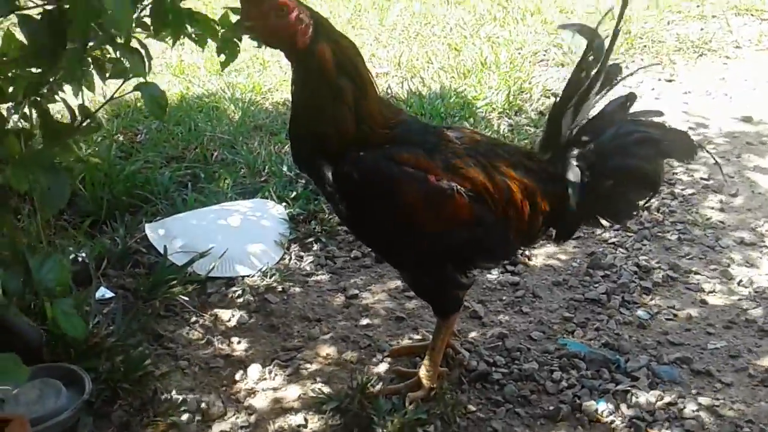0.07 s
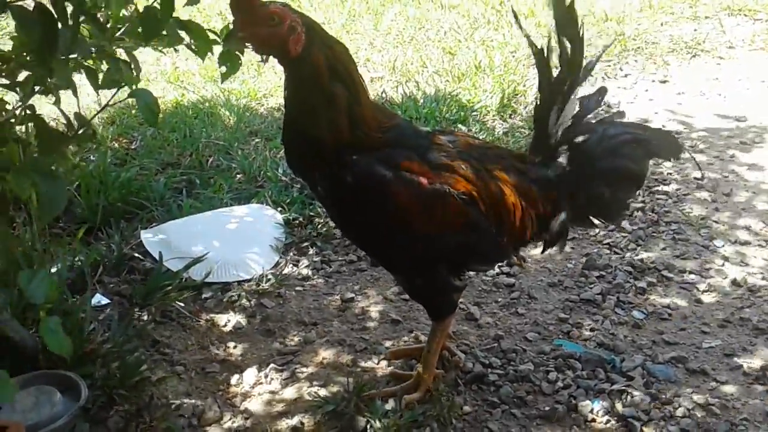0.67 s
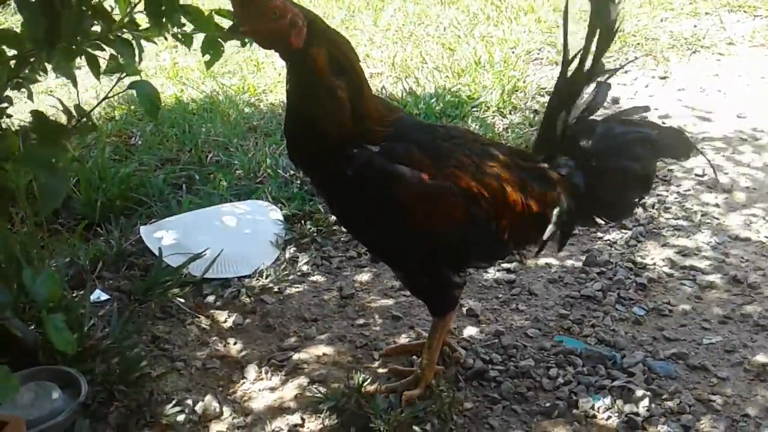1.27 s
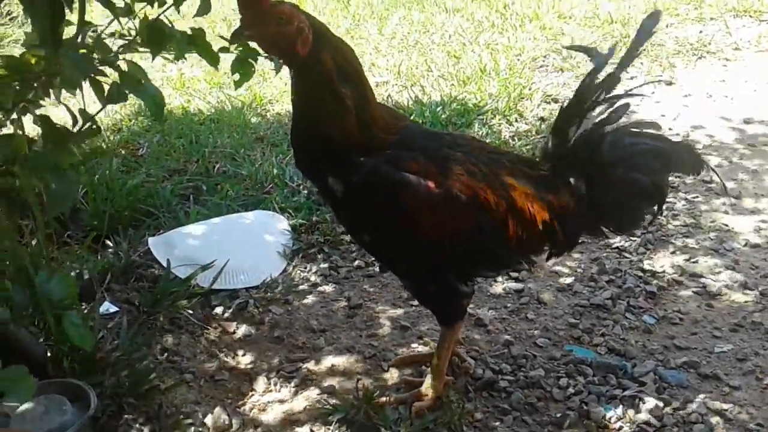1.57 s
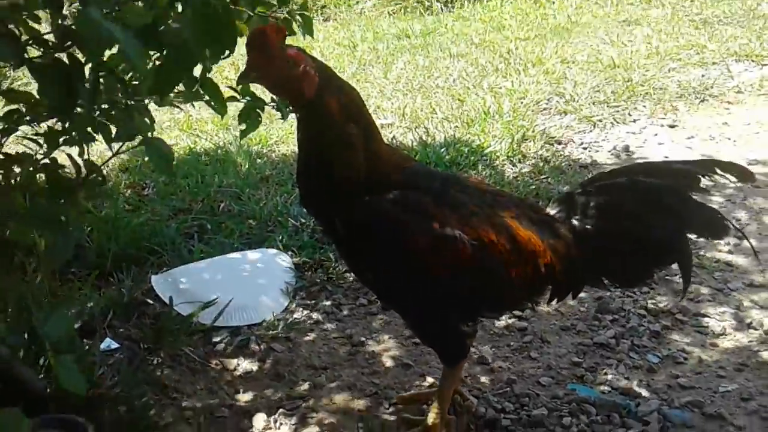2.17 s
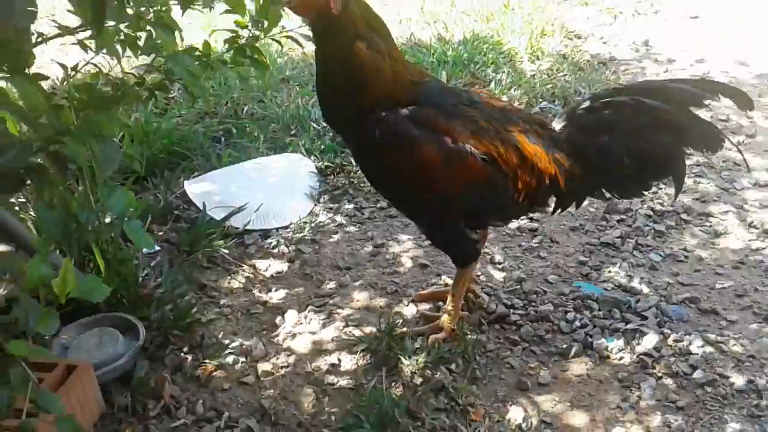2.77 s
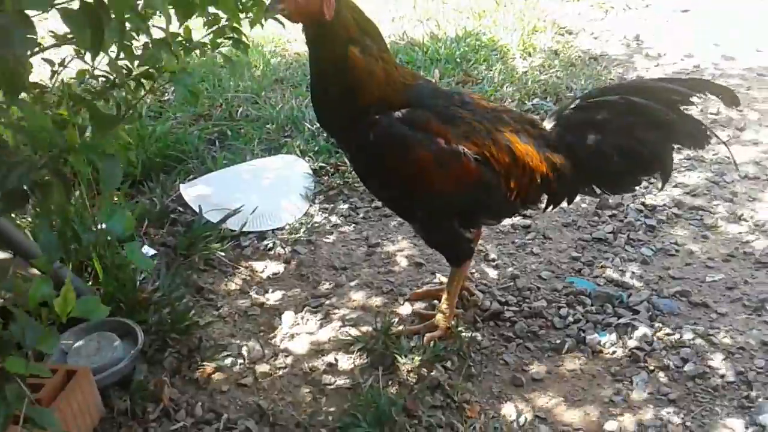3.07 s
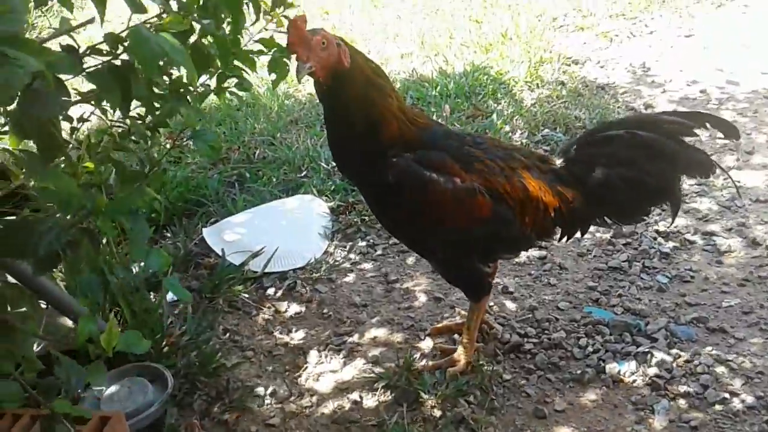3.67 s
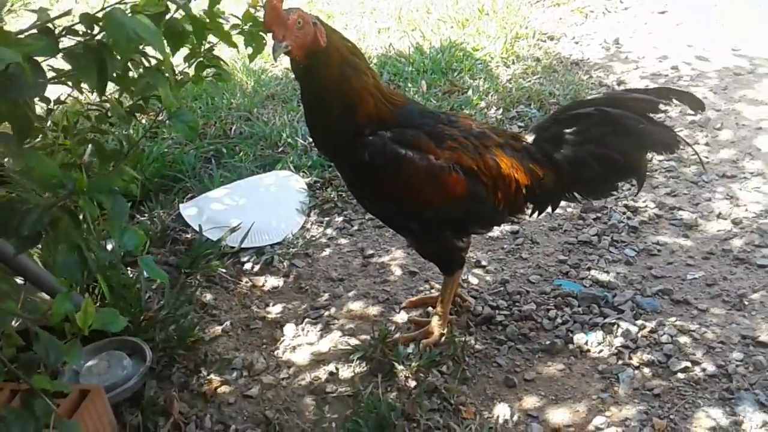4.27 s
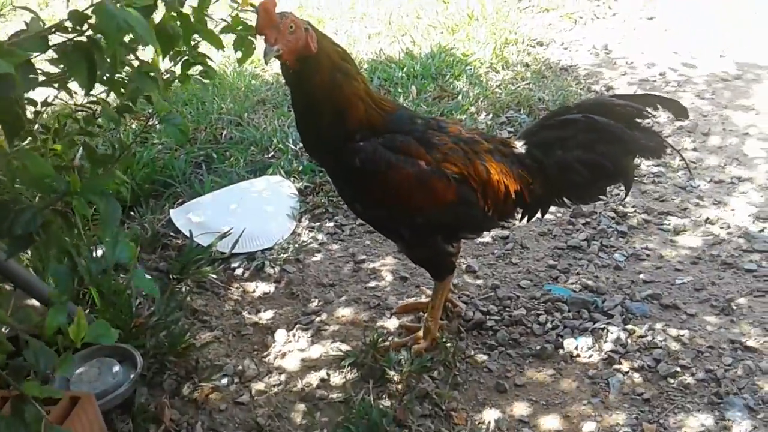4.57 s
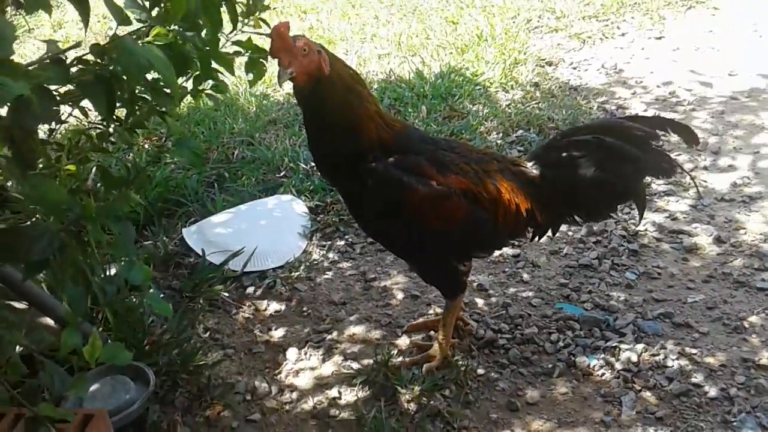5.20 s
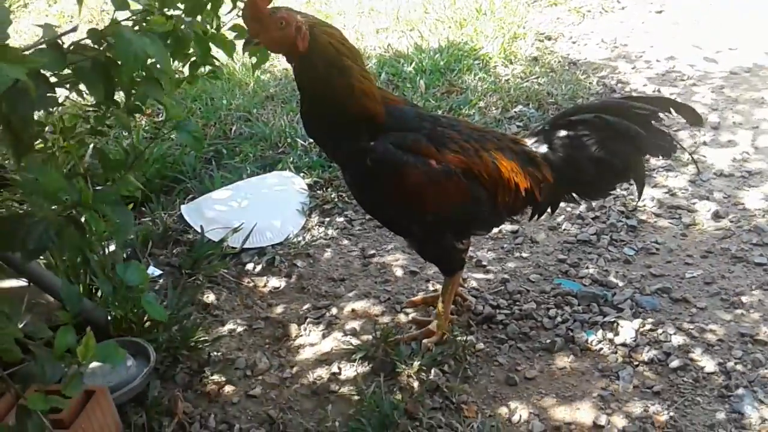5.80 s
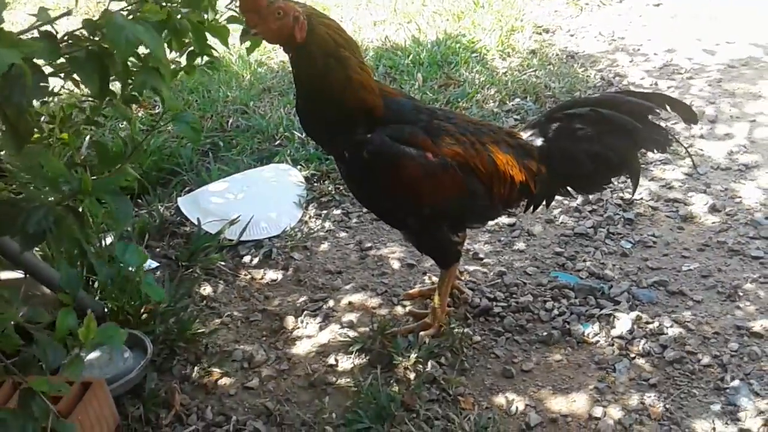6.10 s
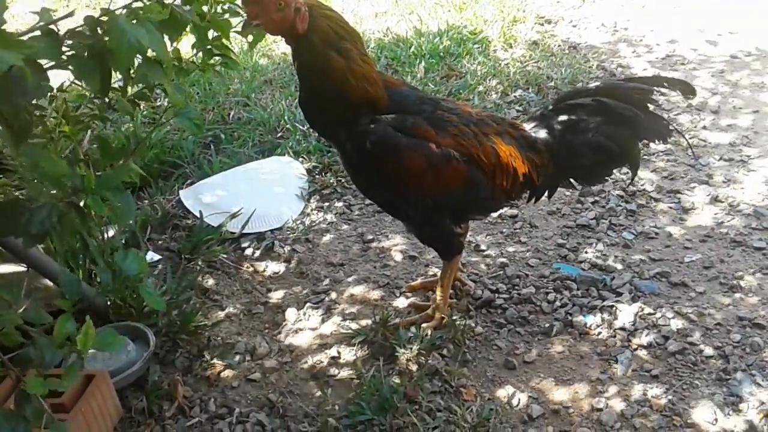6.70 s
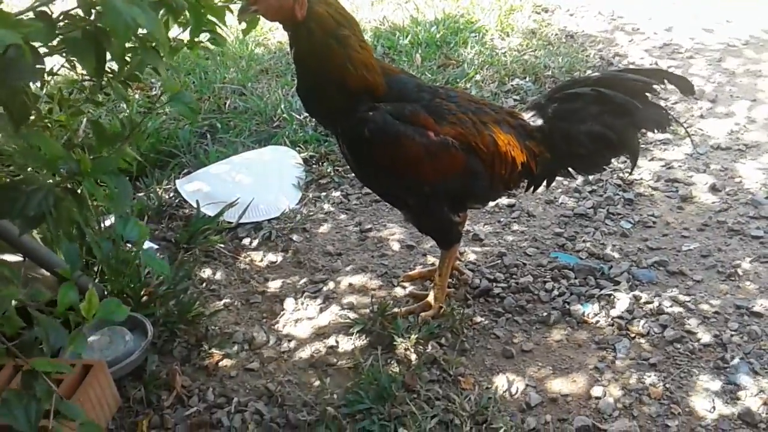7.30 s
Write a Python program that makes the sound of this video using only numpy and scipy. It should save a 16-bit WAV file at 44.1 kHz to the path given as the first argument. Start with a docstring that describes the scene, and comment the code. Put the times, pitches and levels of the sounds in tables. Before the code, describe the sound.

Wind thumps on the microphone, then a rooster clucks softly and squawks once over a steady outdoor hiss and faint leaf rustle.

```python
"""Rooster in a breezy yard

A rooster gives three soft clucks, one loud rasping squawk and a last cluck: uneven pulses
and puffs of breath from his syrinx, coloured by throat and beak. Wind buffets the
microphone over a steady outdoor hiss and a low drone. Leaves rustle in bright swells,
a small bird whistles far off, and there are two faint clicks."""
import sys
import numpy as np
from scipy import signal
from scipy.fft import rfft, irfft
from scipy.io import wavfile
from scipy.ndimage import uniform_filter1d

SR = 44100
rng = np.random.default_rng(int(sys.argv[2]) if len(sys.argv) > 2 else 0)


def wrap_up_sound(samples):
    """Save the sound to the file named by the first command line argument, as 16-bit audio."""
    columns = np.atleast_2d(samples).T
    # keep every value between -1 and 1, then stretch to whole-number steps
    tamed = np.clip(columns, -1, 1)
    steps = np.round(tamed * 32767).astype(np.int16)
    wavfile.write(sys.argv[1], SR, steps)


N = 328545
TIME = np.arange(N) / SR

# gusts on the microphone: (peak time [s], level [dB], half length [s])
GUSTS = [(0.007, -23.5, 0.082), (0.15, -31, 0.063), (0.485, -30.5, 0.14), (0.67, -23.5, 0.031),
         (1.125, -29.5, 0.034), (1.285, -25, 0.041), (1.408, -24, 0.042), (1.548, -23, 0.058),
         (1.658, -29, 0.059), (1.769, -17.5, 0.07), (1.971, -32.5, 0.036), (4.13, -44.5, .08),
         (4.267, -40.5, 0.056), (4.76, -52, 0.12), (5.7, -43, .17), (6.55, -41.5, .025),
         (6.792, -39.5, 0.13), (7.087, -35.5, 0.052)]
# the strongest eddies, each a distinct thump: (time [s], peak level [dB], centre [Hz])
EDDIES = [(0.037, -12.5, 123), (.046, -11.5, 203), (.118, -20.5, 171), (0.201, -20, 177),
          (.311, -25.5, 157), (.348, -22, 151), (0.469, -12, 178), (.502, -17, 187), (0.637, -12, 177),
          (0.65, -9.5, 181), (1.29, -10.5, 189), (1.382, -21.5, 242), (1.411, -25, 403),
          (1.441, -18.5, 154), (1.543, -16, 161), (1.653, -11, 168), (1.765, -11.5, 273), (1.78, -6, 180),
          (1.802, -11, 178), (1.843, -18.5, 182), (2.776, -37.5, 106), (4.233, -28, 147),
          (4.287, -24.5, 106), (4.872, -34, 94), (5.622, -26, 180), (7.09, -22.5, 136)]
# colour of the wind rumble: (frequency [Hz], level [dB])
WIND_SPECTRUM = [(25, -16), (50, -9), (95, 4), (160, 1.5), (230, -5), (320, -11.5), (450, -24.5),
                 (700, -36), (1200, -44), (3000, -84)]
# the background bed: (time [s], far noise level [dB], hiss level [dB])
BED_LEVELS = [(0, -50, -47.5), (1.5, -51, -48), (3.0, -51.5, -49.5), (4.1, -50, -49), (5.1, -50, -50.5),
              (5.7, -50.5, -52), (7.45, -49, -48.7)]
# colour of the far outdoor noise: (frequency [Hz], level [dB])
FAR_SPECTRUM = [(25, -20), (60, -2.5), (120, 2), (200, 4), (290, 2), (420, -3.5), (650, -1.5), (1100, -4),
                (1800, -9.5), (2800, -19), (5000, -19.5), (12000, -52)]
# colour of the hiss: (frequency [Hz], level [dB])
HISS_SPECTRUM = [(1200, -9.5), (2200, -3.5), (3100, -6), (4500, -1.5), (6500, -3.5), (8700, 1.5),
                 (10000, -5), (11500, -10), (14000, -13.5), (16000, -15.5)]
# soft swells of leaves: (peak time [s], level [dB], half length [s])
RUSTLES = [(0.165, -51, 0.089), (.8, -53.5, 0.11), (1.56, -66, .07), (2.43, -56, .1), (5.06, -51, 0.091),
           (5.238, -58, 0.11), (5.7, -56.5, 0.36), (6.348, -54, 0.056)]
# colour of the leaves: (frequency [Hz], level [dB])
LEAF_SPECTRUM = [(1500, -32), (2500, -3), (4500, -10), (7000, -1), (9300, 8), (11500, -3.5), (16000, -11)]
# one contour for each far whistle: (time [s], level [dB], pitch [Hz])
WHISTLES = [
    [(1.36, -70, 4500), (1.41, -60, 4800), (1.44, -60, 5100), (1.465, -56, 5550), (1.505, -51, 5720),
     (1.522, -66, 5650)],
    [(5.03, -68, 2750), (5.07, -57, 2620), (5.11, -58, 2520), (5.14, -70, 2480)],
]
# early reflections off ground and bushes: (delay [s], gain [ratio])
REFLECTIONS = [(.0025, .15), (.0051, .07), (.118, .02)]
# the yard's tail: (frequency [Hz], time to fall 60 dB [s])
ECHO_T60 = [(200, 1), (1200, 0.54), (4000, 0.058), (12000, 0.031)]
# clucks: (start [s], beak open [s], effort [dB], swell while open [dB], end pitch [Hz],
# rise while open [share of pitch], beak opening [ratio], neck posture [ratio])
CLUCKS = [(2.962, 0.0216, -40.5, 2.5, 313, -0.088, 0.93, 1.07),
          (3.145, 0.031, -37.5, 1, 292.6, -0.055, 1.05, 0.99), (3.339, 0.031, -34, 5.5, 331, .12, 1, 1.02),
          (3.772, 0.033, -32, 9, 330, 0.16, 1, 0.89)]
# throat resonances in a cluck: (centre [Hz], width [Hz], level [dB])
CLUCK_THROAT = [(310, 180, 9), (650, 490, 8.5), (1250, 360, 10.5), (2090, 98, -5), (4000, 780, -6.5),
                (5100, 490, -13)]
# the squawk breaks into a rasp, holds a clear note and ends in a rattle:
# (time [s], effort [dB], pitch [Hz], roughness [0-1], beak opening [ratio])
SQUAWK = [(3.516, -46, 385, .1, .97), (3.525, -28, 398, .15, 1.0), (3.541, -15.5, 416, .28, 1.04),
          (3.564, -15.8, 418, .65, 1.01), (3.586, -17.3, 386, .3, .97), (3.623, -20.5, 376, .18, .95),
          (3.626, -30, 375, .85, .97), (3.647, -28.5, 385, .85, .97), (3.657, -48, 380, .5, .95)]
# throat resonances in the squawk: (centre [Hz], width [Hz], level [dB])
SQUAWK_THROAT = [(412, 70, -24), (1030, 175, -6), (1254, 265, 0), (1400, 89, -36), (2230, 230, -22),
                 (3460, 620, -19.5), (3910, 130, -14.5), (4080, 170, -16.5), (4540, 850, -22),
                 (6050, 470, -28), (7680, 2500, -26), (9020, 2000, -25), (11700, 720, -37)]
# the voice catches in the rasp: (time [s], dip [dB], half length [s])
CATCHES = [(3.546, -9, .0016), (3.5565, -15, .0022), (3.5675, -8, .002), (3.5792, -8, .001)]
# faint clicks: (time [s], level [dB], centre [Hz], width [Hz], decay [s])
CLICKS = [(4.712, -41, 7500, 16000, .004), (4.991, -31, 600, 700, .0018)]


def from_db(db):
    """Decibels to gain."""
    return 10 ** (np.asarray(db) / 20)


def unit(x):
    """Scales to rms 1."""
    return x / np.sqrt(np.mean(x ** 2) + 1e-20)


def on_log_axis(points, hz):
    """Reads a table along a log frequency axis."""
    f, value = np.transpose(points)
    return np.interp(np.log(hz + 1), np.log(f + 1), value)


def curves(rows, t):
    """A table's columns as automation curves at the times t."""
    s, *columns = np.transpose(rows)
    return [np.interp(t, s, c) for c in columns]


def add(mix, s, sound):
    """Mixes a sound in at time s."""
    part = mix[max(round(s * SR), 0):][:len(sound)]
    part += sound[:len(part)]


def butter(x, kind, hz, order):
    """A Butterworth low or high cut."""
    return signal.sosfilt(signal.butter(order, hz, kind, fs=SR, output="sos"), x)


def noise(spectrum):
    """Steady noise of a given colour."""
    gain = from_db(on_log_axis(spectrum, np.fft.rfftfreq(N, 1 / SR)))
    return unit(irfft(rfft(rng.standard_normal(N)) * gain, N))


def wander(t, rate_hz):
    """A random curve that takes a new value rate_hz times a second."""
    return np.interp((t - t[0]) * rate_hz, np.arange(2048), rng.standard_normal(2048))


def levelled(x, span_s):
    """Rides out swells slower than span_s and keeps the quick flutter."""
    size = max(int(span_s * SR), 8)
    power = uniform_filter1d(uniform_filter1d(x ** 2, size), size)
    return x / np.sqrt(abs(power) + 1e-14)


def resonance(x, hz, width):
    """A steep resonance of gain 1 that follows the curve hz."""
    turn = np.exp(2j * np.pi * np.cumsum(hz * np.ones(len(x))) / SR)
    r = np.exp(-np.pi * width / SR)
    return 2 * (turn * signal.lfilter([(1 - r) ** 2], [1, -2 * r, r * r], x / turn)).real


def wind(breeze_db=-58, light_air_db=-45.5, gust_db=-1, lumpy_db=5.5, eddy_db=1, eddy_cycles=.88):
    """Lumpy gusts swell and die at the microphone; each strong eddy is a brief pressure swing."""
    gusts = [from_db(db) * np.exp(-abs((TIME - s) / half) ** 1.18) for s, db, half in GUSTS]
    flow = np.sqrt(from_db(breeze_db) ** 2 + sum(gust ** 2 for gust in gusts))
    brisk = noise(WIND_SPECTRUM)
    light = unit(butter(noise(WIND_SPECTRUM), "lowpass", hz=150, order=1))  # slow air is duller
    share = flow / (flow + from_db(light_air_db))
    turbulence = levelled(np.sqrt(share) * brisk + np.sqrt(1 - share) * light, span_s=.04)
    pressure = turbulence * flow * from_db(gust_db + lumpy_db * np.tanh(wander(TIME, 70)))
    t = np.arange(-.03, .03, 1 / SR)
    for (s, db, hz), phase in zip(EDDIES, rng.random(len(EDDIES))):
        swing = np.cos(2 * np.pi * (hz * t + phase)) / np.cosh(t * hz / eddy_cycles * 2)
        add(pressure, s + t[0], from_db(db + eddy_db) * swing)
    # pressure grows with the square of the flow, so strong swings gain overtones
    pressure += .7 * butter(pressure ** 2, "highpass", hz=200, order=4)
    return butter(pressure, "highpass", hz=68, order=3)  # the small microphone passes no deep bass


def background(drone_db=-53):
    """A bed of far outdoor noise, bright hiss and a low, distant drone."""
    far_db, hiss_db = curves(BED_LEVELS, TIME)
    far = noise(FAR_SPECTRUM) * from_db(far_db + .5 * wander(TIME, 14))
    hiss = noise(HISS_SPECTRUM) * from_db(hiss_db + .63 * wander(TIME, 22))
    drone = unit(resonance(rng.standard_normal(N), hz=191.3, width=22))
    return far + hiss + from_db(drone_db) * drone


def leaves():
    """Leaves rustle in brief swells of bright noise."""
    level = sum(from_db(db) * np.exp(-((TIME - s) / half) ** 2) for s, db, half in RUSTLES)
    return noise(LEAF_SPECTRUM) * level


def small_bird(waver_hz=90):
    """Thin, far whistles: gliding sines with a fast waver."""
    out = np.zeros(N)
    for contour in WHISTLES:
        t = np.arange(contour[0][0], contour[-1][0], 1 / SR)
        db, hz = curves(contour, t)
        cycles = np.cumsum(hz + waver_hz * wander(t, 430)) / SR
        add(out, t[0], from_db(db) * unit(np.sin(2 * np.pi * cycles)))
    return out


def reflections(x):
    """Near surfaces repeat a call faintly and comb its spectrum."""
    out = np.zeros(N)
    for delay, gain in REFLECTIONS:
        add(out, delay, gain * x)
    return out


def yard_echo(x, taps_per_s=2000, predelay_s=.008):
    """Thin scatter from bushes and ground; the treble dies first."""
    taps = rng.standard_normal(SR) * (rng.random(SR) < taps_per_s / SR)
    taps *= np.arange(SR) > predelay_s * SR
    hz, t, spectrum = signal.stft(taps, SR, nperseg=256)
    decay = from_db(-60 * t / on_log_axis(ECHO_T60, hz)[:, None])
    tail = signal.istft(spectrum * decay, SR, nperseg=256)[1]
    return signal.fftconvolve(x, tail / np.linalg.norm(tail))[:N]


def cluck(start, open_s, effort_db, swell_db, pitch_hz, rise, opening,
          attack_s=.0045, shut_s=.0056, tail_s=.04, fade_db_per_s=482):
    """Curves for one cluck: it swells and bends, then the beak snaps shut on a soft, dying hum."""
    t = np.arange(0, open_s + tail_s, 1 / SR)
    to_go, after = np.maximum(1 - t / open_s, 0), np.maximum(t - open_s, 0)
    shut = np.clip((t - open_s) / shut_s + .5, 0, 1)
    attack_db = 20 * np.log10(np.clip(t / attack_s, .05, 1))
    db = effort_db + attack_db - swell_db * to_go - .5 * shut - fade_db_per_s * after
    rough = np.interp(shut, [0, 1], [.35, .15])
    beak = np.interp(shut, [0, 1], [opening, .643])
    return start + t, db, pitch_hz * (1 - rise * to_go), rough, beak


def syrinx(t, hz, rough, jitter, shimmer):
    """The voice source beats unevenly and lets out a puff of air each cycle."""
    cycles = np.cumsum(hz) / SR
    uneven = cycles + jitter * rough * (wander(t, 350) + .5 * wander(t, 138.3))
    pulses = sum(np.cos(2 * np.pi * k * uneven) for k in range(1, 40) if k != 3)
    pulses *= 1 + shimmer * rough * wander(t, 416)
    # the throat locks the third harmonic into a clean tone, except where the voice is rough
    pulses += (1 - rough ** 2) * np.cos(2 * np.pi * 3 * cycles)
    puffs = (.71 + np.exp(-(cycles % 1) / .38)) * rng.standard_normal(N)[:len(t)]
    return unit(pulses), unit(puffs)


def voice(t, effort_db, hz, rough, beak, throat, neck,
          edge_db, jitter, shimmer, rasp, muffle_db, strain, notch_hz=1740):
    """The throat shapes the syrinx into a low body, tuned by the beak, and an edge, by the neck."""
    pulses, puffs = syrinx(t, hz, rough, jitter, shimmer)
    body, edge = 0, 0
    for centre, width, db in throat:
        # the higher the resonance, the more it is fed by turbulence
        airy = np.clip(rasp * rough + (centre / 4800) ** 2, 0, .95)
        drive = from_db(db) * (np.sqrt(1 - airy ** 2) * pulses + airy * puffs)
        if centre < notch_hz:
            body += resonance(drive, centre * beak, width)
        else:  # a closing beak muffles the upper resonances
            edge += resonance(drive, centre * neck, width) * from_db(muffle_db * (beak - 1))
    notch = signal.iirnotch(notch_hz, notch_hz / 400, SR)  # 400 Hz wide
    body, edge = signal.lfilter(*notch, [body, edge])
    # the rasping edge follows the effort at its own rate
    edge = edge / np.std(body) * from_db(edge_db + strain * (effort_db - effort_db.max()))
    catch_db = sum(db * np.exp(-((t - s) / half) ** 2) for s, db, half in CATCHES)
    body = levelled(body, span_s=.002) * from_db(catch_db)
    call = from_db(effort_db) * (body + edge) * signal.windows.tukey(len(t), .05)
    # the call carries nothing below about three quarters of its lowest pitch
    return butter(call, "highpass", hz=.75 * hz.min(), order=4)


def rooster(squawk_trim_db=-1.1):
    """Soft low clucks around one forced squawk, all from the same voice."""
    out = np.zeros(N)
    for *row, neck in CLUCKS:
        t, *controls = cluck(*row)
        add(out, t[0], voice(t, *controls, CLUCK_THROAT, neck, edge_db=2,
                             jitter=.11, shimmer=.7, rasp=.75, muffle_db=35, strain=.1))
    t = np.arange(SQUAWK[0][0], SQUAWK[-1][0], 1 / SR)
    squawk = voice(t, *curves(SQUAWK, t), SQUAWK_THROAT, neck=1, edge_db=-3.8,
                   jitter=.13, shimmer=.9, rasp=1, muffle_db=20, strain=-.08)
    add(out, t[0], from_db(squawk_trim_db) * squawk)
    return out


def clicks():
    """Two dry ticks of fast-dying noise, one bright and one dull."""
    out, t = np.zeros(N), np.arange(2048) / SR
    for s, db, hz, width, decay in CLICKS:
        burst = levelled(resonance(rng.standard_normal(len(t)), hz, width), span_s=.0068)
        add(out, s, from_db(db) * burst * np.exp(-t / decay))
    return out


def scene(echo_send_db=-27):
    """The mono mix: both birds get the yard's echo, everything else stays dry."""
    birds = rooster() + small_bird()
    birds = birds + reflections(birds) + from_db(echo_send_db) * yard_echo(birds)
    return (birds + wind() + leaves() + background() + clicks())[None]


def record(dry):
    """A steep high cut takes the very top off the mix."""
    high_cut = signal.firwin(601, cutoff=15850, window=("kaiser", 9), fs=SR)
    return signal.oaconvolve(dry, high_cut[None], "same")


dry = scene()
out = record(dry)
wrap_up_sound(out)
```